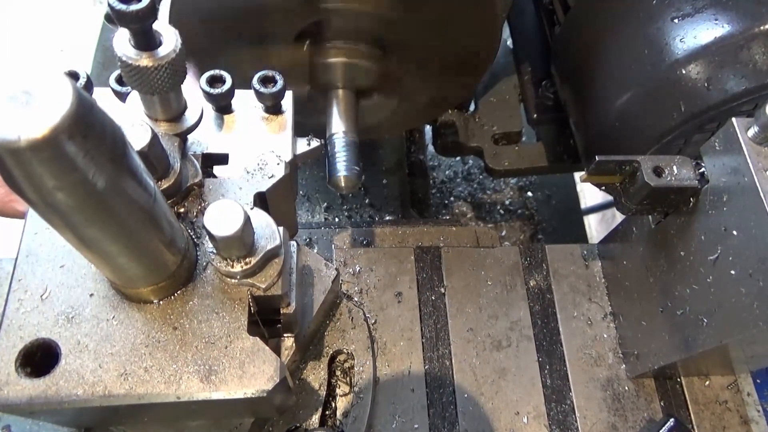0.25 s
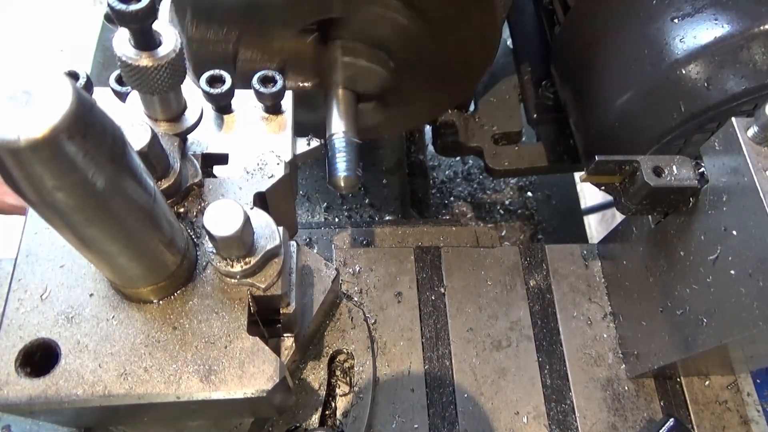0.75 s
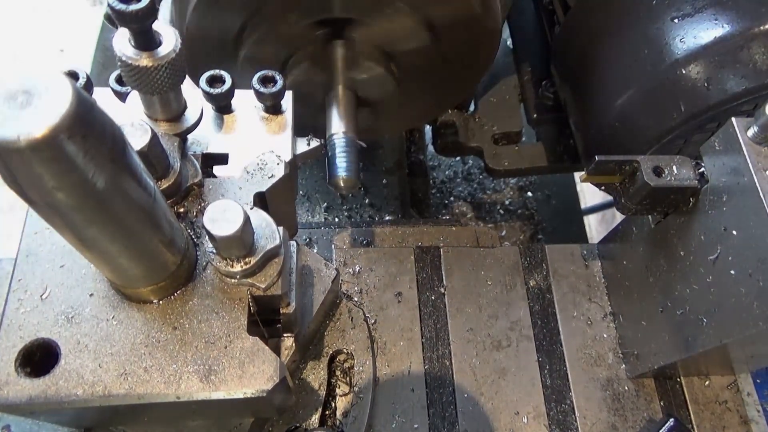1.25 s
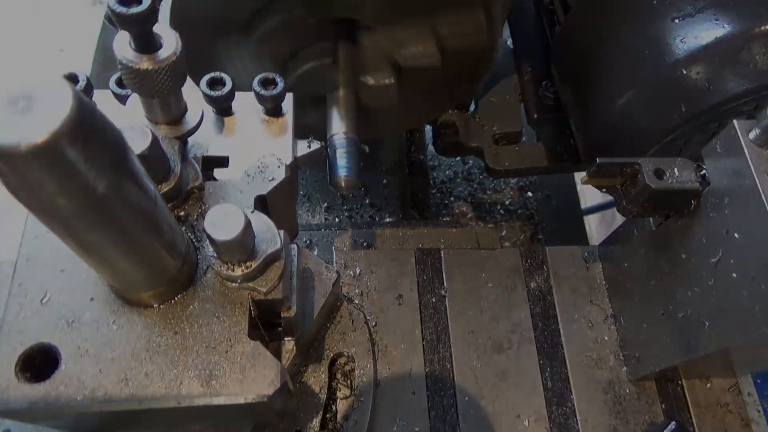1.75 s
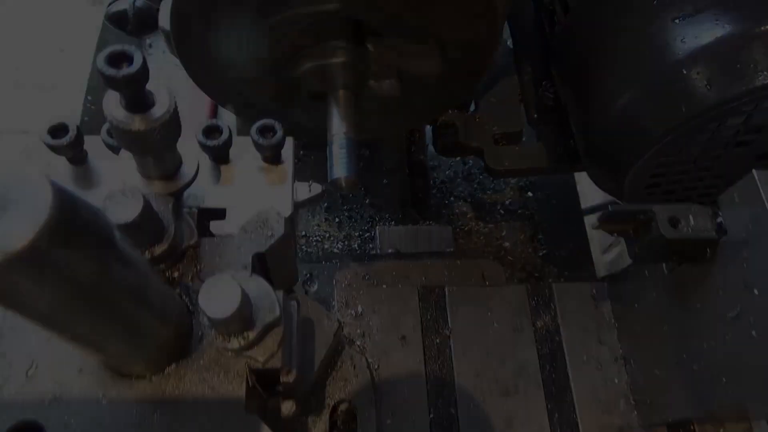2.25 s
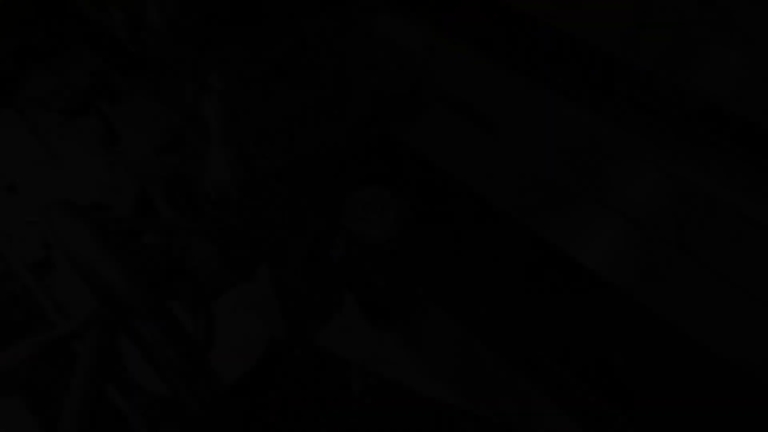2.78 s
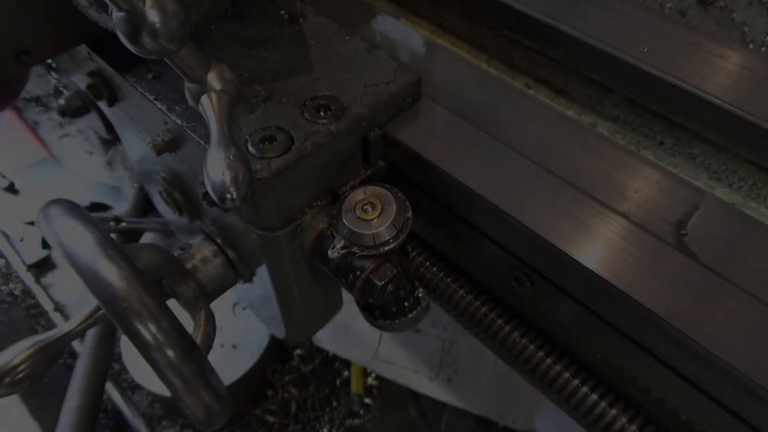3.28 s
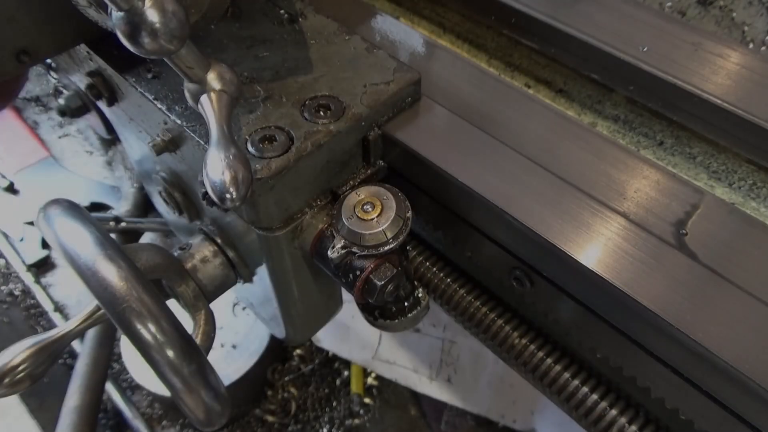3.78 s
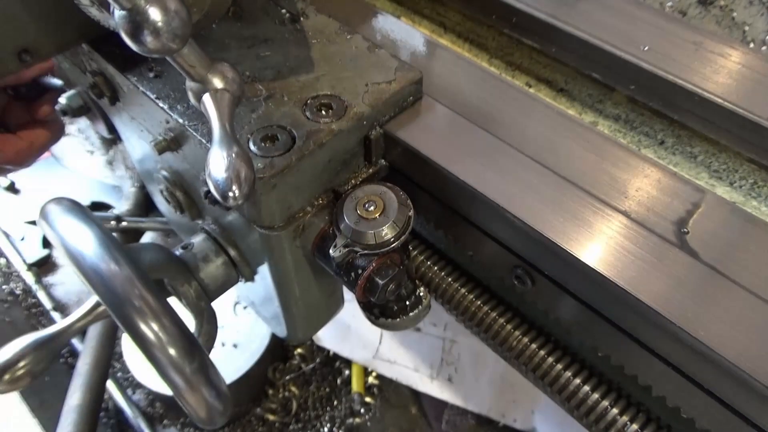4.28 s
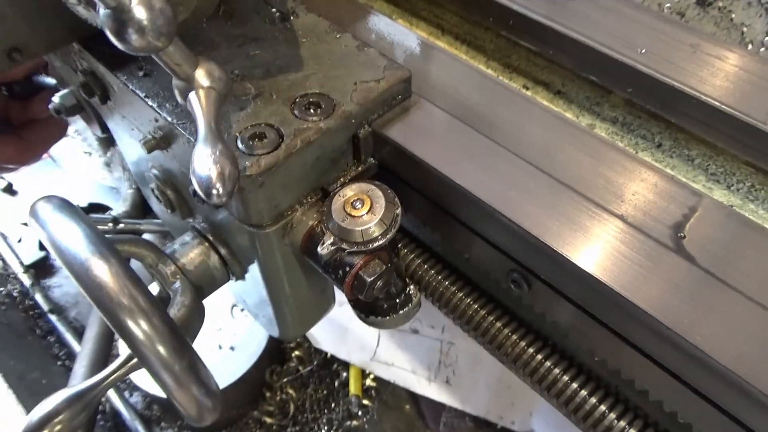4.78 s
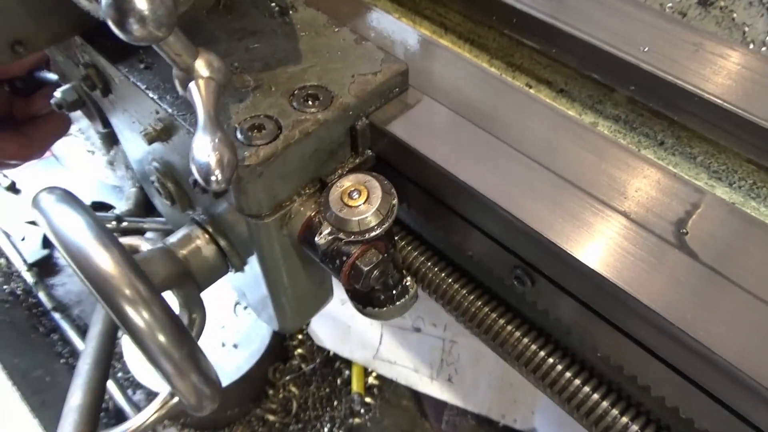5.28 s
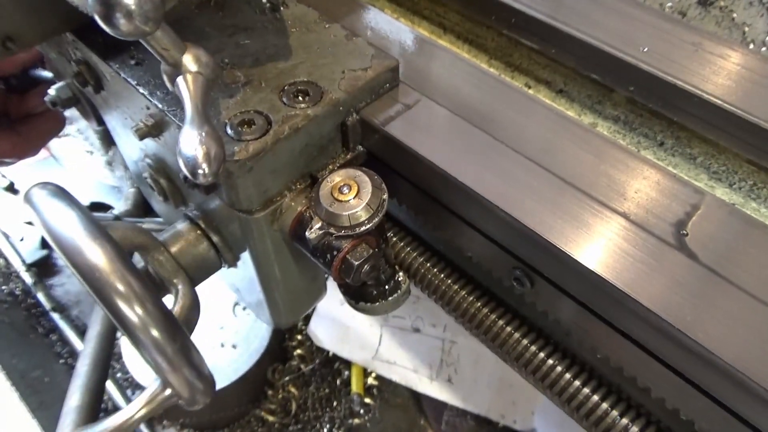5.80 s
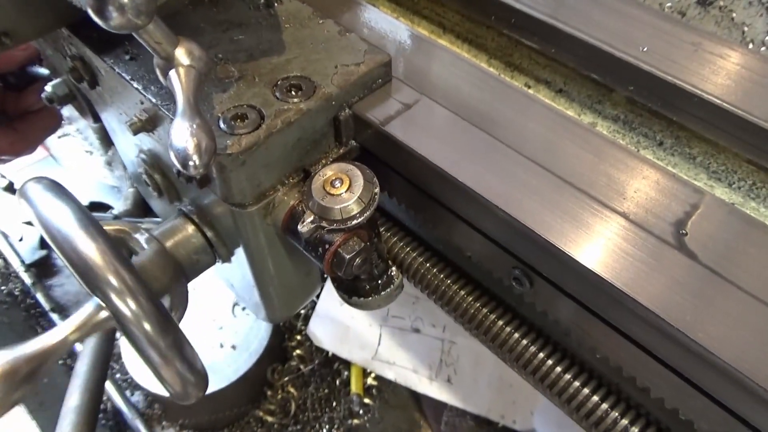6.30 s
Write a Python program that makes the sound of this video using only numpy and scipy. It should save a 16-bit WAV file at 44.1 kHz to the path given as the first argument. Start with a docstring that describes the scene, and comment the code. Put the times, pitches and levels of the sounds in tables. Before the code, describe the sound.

A piercing, steady high whistle rides over the rough churning and humming of a running metal lathe, with two hard lever clacks past the middle.

```python
"""Beside the chuck of a metal lathe, then at its carriage by the leadscrew, while it cuts a thread.
The inverter-fed motor whistles near 10 kHz as sidebands about a carrier, and hums on drive multiples.
Gears churn and rattle as noise filtered by the resonances of the iron castings.
A lever on the apron clacks twice, as bursts of noise in steel modes over decaying casting tones;
chips and teeth tick, rough swells come and go, and a limiter briefly lowers the level at peaks."""
import sys
import numpy as np
from scipy.fft import rfft, irfft, next_fast_len
from scipy.io import wavfile
from scipy.ndimage import uniform_filter1d, minimum_filter1d, map_coordinates

SR = 44100
rng = np.random.default_rng(int(sys.argv[2]) if len(sys.argv) > 2 else 0)


def dump_mix(stems):
    """Bounce the given channels to the path in sys.argv[1] as a 16-bit WAV at rate SR."""
    frames = np.atleast_2d(stems).T  # one column per channel
    limited = np.clip(frames, -1, 1)  # hard clip at full scale
    pcm = np.round(limited * 32767).astype(np.int16)
    wavfile.write(sys.argv[1], SR, pcm)


N = 288414

MOVE_S = 2.78  # the listening place changes from chuck to carriage
DRIVE_HZ, SLOT_HZ = 48.45, 721.4  # drive frequency, rate of passing rotor slots
CARRIER_HZ = (9894.5, 9899.7)  # switching carrier before and after the move
SPINDLE_TURN_S = 0.4925
THROW_S = 0.6  # time the drive takes to settle after the lever is thrown
TOP_HZ = 11150  # upper limit of the whole sound
LOAD_JITTER_DB, LOAD_JITTER_RATE = 0.78, 9  # each gear layer's own unsteadiness (dB, knots a second)
# gear layers: [level at chuck/dB, level at carriage/dB, rise per dB of load/dB]
RUMBLE_LEVEL = (-40.5, -37.5, 0.72)
CHURN_LEVEL = (-42.5, -36.5, 1.1)
RATTLE_LEVEL = (-35, -33.5, 0.49)

# inverter sidebands: [offset/drive cycles, relative level at chuck/dB, at carriage/dB]
CARRIER_SIDEBANDS = [(-15, -56, -51), (-14, -56, -49), (-12, -54, -52), (-11, -51, -47), (-9, -54, -43),
                     (-8, -49, -49), (-7, -50, -53), (-6, -45, -46), (-5, -45, -43), (-3, -30, -30),
                     (-2, -46, -38), (-1, -38, -43), (0, -33, -40), (1, -35, -41), (2, -44, -41),
                     (3, -24, -26), (4, -42, -37), (5, -28, -32), (6, -43, -36), (7, -32, -36),
                     (8, -51, -42), (9, -54, -43), (10, -54, -46), (11, -55, -50), (12, -52, -55),
                     (13, -54, -53)]
# spectrum of the switching jitter: [f/Hz, relative level/dB]
JITTER_SPECTRUM = [(8000, -29), (9000, -18.5), (9600, -13), (10000, 6.5), (10150, -7), (10400, -5.5),
                   (11000, -29.5), (11500, -64)]
# slow course of the whistle: [t/s, level/dB]
WHISTLE_LEVEL = [(0.0, -20.5), (1.56, -20.0), (1.68, -22.0), (2.28, -19.5), (2.34, -20.5), (2.7, -19.5),
                 (3.06, -22), (3.12, -23), (3.96, -22.0), (4.26, -23), (5.22, -20.5), (5.82, -23.5),
                 (5.94, -22.5), (6.52, -23)]
# lever contacts: [t/s, relative level/dB, upper edge set by hardness f/Hz]
LEVER_CONTACTS = [(4.0722, -2, 2750), (4.1552, -1.5, 9500), (4.165, -18, 6000), (4.177, -22, 6000),
                  (4.184, -22, 9000)]
# casting tones under the blows on the apron: [t/s, relative level/dB, f/Hz]
APRON_THUDS = [(4.076, -5, 488), (4.132, -14, 447), (4.163, -6, 170)]
# modes of the struck steel: [f/Hz, width/Hz, relative level/dB]
STEEL_MODES = [(1400, 300, -9.5), (2760, 370, 2), (3440, 920, -2), (4650, 850, -3), (5650, 620, 1),
               (6330, 330, -5), (7040, 430, 1.5), (8370, 540, 3), (9400, 590, -2)]
# ticks of chips and gear teeth: [t/s, relative level/dB]
TOOTH_TICKS = [(1.047, -22), (1.4182, -24), (1.962, -29), (2.7815, -28), (3.5848, -28), (3.79, -23.5),
               (4.244, -28), (5.8303, -29)]
# shudders and scrapes: [t/s, half length/s, level/dB, centre f/Hz]
ROUGH_SURGES = [(2.715, 0.034, -32, 910), (4.10, 0.026, -28.5, 520), (4.15, 0.017, -28, 380),
                (4.185, 0.04, -29.5, 232), (5.603, 0.046, -32.5, 426), (5.75, 0.027, -37.5, 2600),
                (6.017, 0.048, -29.5, 467), (6.285, .015, -40.5, 2600), (6.52, .035, -30.5, 430)]
# load on the gear train, followed by every gear layer and the hum: [t/s, level/dB]
GEAR_LOAD = [(0, -1), (1.4, 0.3), (1.9, -1.4), (2.7, 0), (2.94, 2.5), (3.2, -0.8), (4.0, 0.9), (5.4, -0.8),
             (5.6, 2), (6.54, 2.5)]
# broad spectrum of the churning: [f/Hz, relative level at chuck/dB, at carriage/dB]
CHURN_SPECTRUM = [(22, -29, -16), (44, -19, -20), (60.7, -25, -8), (78, -9.5, -5.5), (120, -3.5, 5.5),
                  (176, -8.5, -1), (250, -14.5, -10.5), (338, -15.5, -11), (600, -14.5, -15),
                  (1565, -12, -10), (2060, -19.5, -17), (3600, -24.5, -21.5), (6600, -27.5, -26.5),
                  (8500, -28, -24)]
# casting resonances: [f/Hz, width/Hz, lift at chuck/dB, lift at carriage/dB]
CASTING_MODES = [(463, 124, 5.5, 10), (907, 66, 7, 7), (1047, 22, 3, 6), (1170, 99, 3, 6),
                 (1658, 34, 7.5, 7), (1770, 123, 4.5, 6), (2150, 170, 5.5, 6.5), (2600, 300, 6, 0.5),
                 (2830, 100, 3.5, 3.5), (3365, 55, 2, 6.5), (4230, 210, 3, -0.5), (4630, 120, -4, 3),
                 (5070, 110, 2.5, 4)]
# low growl tones: [multiple of drive f, level over churn at chuck/dB, at carriage/dB]
GEAR_GROWL = [(8, -6.5, -5.5), (10, -19.5, -9.5)]
# magnetic hum: [multiple of drive f, relative level at chuck/dB, at carriage/dB,
# change once the lever is thrown/dB, rise per dB of load/dB, beat depth 0-1 at chuck, at carriage]
HUM_LINES = [(3, -36, -35, -0.5, 0.5, 0, 0.23), (6, -40.5, -41, 1.4, 1.13, 0.06, 0.27),
             (16, -39, -46, 7, 0.87, 0.43, 0.26)]
# beat of each hum line with a close neighbour, the upper two once per spindle turn:
# [period/s, first crest t/s]
LINE_BEATS = [(0.73, 0.485), (SPINDLE_TURN_S, 0.137), (SPINDLE_TURN_S, 0.268)]
# momentary fades of a hum line: [multiple of drive f, t/s, half length/s, change/dB]
LINE_FADES = [(3, 2.25, 0.42, -3), (3, 6.35, 0.2, -2.5), (6, 5.36, 0.094, -12), (16, 2.6, 0.27, -3)]
# rough motor drone: [multiple of drive f, level at chuck/dB, at carriage/dB]
MOTOR_DRONE = [(14, -49, -61), (18, -46, -45), (22, -45.5, -48), (24, -51, -39), (36, -56, -58)]
# rotor slot tones: [multiple of slot rate, drive cycles added before rounding,
# level at chuck/dB, at carriage/dB]
SLOT_TONES = [(1, -3, -51.5, -61.5), (1, -1.5, -55, -63), (1, 0, -39, -46.5), (1, 8.5, -47, -47),
              (2, 1.5, -49.5, -53.5), (3, 0, -55, -52.5), (3, 2.5, -55.5, -73)]
# thin motor tones: [f/Hz, level/dB]
THIN_TONES = [(2537, -58.5), (2596, -55.5), (8056, -55.5), (8347, -74), (8638, -56), (8742, -68),
              (9032, -49)]
# rough whirr after the throw of the lever: [multiple of drive f, relative level/dB]
FEED_WHIRR = [(10, -40.5), (36, -48), (38, -50), (45, -49)]
# stereo coherence: [f/Hz, left-right likeness 0-1]
EAR_LIKENESS = [(40, 1), (150, 0.84), (300, 0.54), (1000, 0.87), (4000, 0.72), (9000, 0.97)]


def inverter(jitter_db=-10.0):
    """Pulse-width switching: a carrier and its sidebands sing in the motor shell, with a hiss of jitter."""
    t = clock()
    carrier = np.cumsum(CARRIER_HZ[0] + moved() * (CARRIER_HZ[1] - CARRIER_HZ[0])) / SR
    lines = np.zeros((2, N))
    for k, chuck_db, carriage_db in CARRIER_SIDEBANDS:
        cycles = carrier + k * DRIVE_HZ * t
        lines += tone(cycles, between(chuck_db, carriage_db), waver=0.16, rate=7.1, width=0.16, scatter=0.77)
    noise = spread(rng.standard_normal((2, N)))
    jitter = unit(filtered(noise, lambda hz: amp(along(JITTER_SPECTRUM, hz))))
    # the whistle swells twice within each drive cycle
    bursts = (even(lines) + amp(jitter_db) * jitter) * buzz(depth=.36)
    return amp(curves(WHISTLE_LEVEL)[0]) * even(bursts)


def lever():
    """Impact of unequal bodies: light steel clicks and rings briefly while the heavy apron thuds."""
    out = np.zeros((2, N))
    for s, db, edge_hz in LEVER_CONTACTS:
        out += amp(db) * knock(s, edge_hz, t60=0.013, ring_db=-21, ring_t60=0.14)
    t = np.arange(SR // 3) / SR
    for s, db, hz in APRON_THUDS:
        # two close modes of the heavy casting swell and die together
        lower_mode = 0.53 * np.sin(2 * np.pi * (0.784 * hz * t + rng.random()))
        pair = np.sin(2 * np.pi * hz * t) + lower_mode
        envelope = (1 - np.exp(-t / 0.0064)) * amp(-60 * t / 0.07)
        out += placed(s, amp([[db], [db]]) * pair * envelope)
    return out


def ticks(tick_db=-10):
    """Small impacts: chips and loose teeth tick against the steel."""
    out = np.zeros((2, N))
    for s, db in TOOTH_TICKS:
        out += amp(db + tick_db) * knock(s, edge_hz=4500, t60=0.045, ring_db=-7, ring_t60=0.15)
    return out


def knock(s, edge_hz, t60, ring_db, ring_t60):
    """Impact excites modes: a short crack and a weaker ring; a softer contact loses the highs above edge_hz."""
    t = np.arange(SR // 3) / SR

    def response(hz):
        modes = sum(amp(db) / (1 + (2 * (hz - f) / width) ** 2) for f, width, db in STEEL_MODES)
        return modes / (1 + (hz / edge_hz) ** 4)

    steel = unit(filtered(spread(rng.standard_normal((2, len(t)))), response))
    rise = 1 - np.exp(-t / .001)
    crack = amp(-60 * t / t60)
    ring = amp(ring_db - 60 * t / ring_t60)
    return placed(s, steel * rise * (crack + ring))


def gears(spiky=0.31):
    """Random excitation of a resonant body: countless tooth and bearing contacts shake the castings."""
    contacts = rng.standard_normal((2, N)) * np.exp(spiky * np.tanh(wobble(700)))
    shake, place = spread(contacts), moved()
    at_chuck = unit(castings(shake, axis=1)) * np.sqrt(1 - place)
    at_carriage = unit(castings(shake, axis=2)) * np.sqrt(place)
    body = at_chuck + at_carriage

    def below(hz, edge_hz):
        return 1 / (1 + (hz / edge_hz) ** 8)

    # the rumble leans to the left
    rumble = filtered(body, lambda hz: below(hz, edge_hz=300)) * amp([[1.1], [-1.1]])
    churn = filtered(body, lambda hz: below(hz, edge_hz=856) - below(hz, edge_hz=234))
    rattle = filtered(body, lambda hz: 1 - below(hz, edge_hz=580)) * buzz(depth=0.079)
    growl = drive_lines(GEAR_GROWL, waver=0.36, rate=16, width=0.3)
    out = loaded(*RUMBLE_LEVEL) * even(rumble)
    out += loaded(*CHURN_LEVEL) * (even(churn) + growl)
    out += loaded(*RATTLE_LEVEL) * even(rattle)
    return out


def castings(x, axis, ripple_db=3.0):
    """Modal filtering: a broad slope, main resonances and a ripple of many small ones colour one place."""
    spots = np.geomspace(1200, 9000, 130)
    ripple = ripple_db * np.pad(rng.standard_normal(len(spots) - 2), 1)

    def response(hz):
        lift = sum(row[axis + 1] / (1 + (2 * (hz - row[0]) / row[1]) ** 4) for row in CASTING_MODES)
        return amp(along(CHURN_SPECTRUM, hz, axis=axis) + lift + np.interp(hz, spots, ripple))

    return filtered(x, response)


def loaded(chuck_db, carriage_db, per_load):
    """Force sets level: a gear layer follows the listening place and the load, a little unsteadily."""
    load_db, = curves(GEAR_LOAD)
    jitter_db = LOAD_JITTER_DB * wobble(LOAD_JITTER_RATE)
    return between(chuck_db, carriage_db) * amp(per_load * load_db + jitter_db)


def hum():
    """Magnetic attraction: lines on drive multiples grow with load, beat, and shift after the lever."""
    load_db, = curves(GEAR_LOAD)
    out = np.zeros((2, N))
    for line, (period_s, crest_s) in zip(HUM_LINES, LINE_BEATS):
        k, chuck_db, carriage_db, lever_db, per_load, chuck_depth, carriage_depth = line
        fade_db = sum(db * swell(s, length) for m, s, length, db in LINE_FADES if round(m) == round(k))
        level = between(chuck_db, carriage_db) * amp(per_load * load_db + lever_db * thrown() + fade_db)
        depth = chuck_depth + moved() * (carriage_depth - chuck_depth)
        level = level * beat(period_s, crest_s, depth)
        out += tone(round(k) * DRIVE_HZ * clock(), level, waver=0.1, rate=12, width=0.047)
    return out * amp(0) * np.array([[1], [-1]]) * amp([[.8], [-.8]]) * np.array([[1], [-1]])


def beat(period_s, crest_s, depth):
    """Interference: the gain of a line that swells and fades against a close neighbour."""
    turn = np.exp(2j * np.pi * (clock() - crest_s) / period_s)
    return np.abs(1 + depth * turn) / np.sqrt(1 + depth ** 2)


def buzz(depth):
    """Force goes as the square of the field: the motor's pull peaks twice in each drive cycle."""
    return unit(1 + depth * np.cos(4 * np.pi * DRIVE_HZ * clock()))


def motor():
    """Periodic magnetic force: a rough drone, the whine of passing rotor slots and a few thin tones."""
    t = clock()
    out = drive_lines(MOTOR_DRONE, waver=0.56, rate=24, width=0.46)
    for m, k, chuck_db, carriage_db in SLOT_TONES:
        cycles = (round(m) * SLOT_HZ + round(k) * DRIVE_HZ) * t
        out += tone(cycles, between(chuck_db, carriage_db), waver=0.14, rate=7, width=0.39)
    for hz, db in THIN_TONES:
        out += tone(hz * t, amp(db), waver=0.38, rate=6.4, width=0.48)
    return out


def feed():
    """Randomly modulated harmonics: after the lever is thrown the gearing adds a rough whirr."""
    whirr = np.zeros((2, N))
    for k, db in FEED_WHIRR:
        whirr += tone(round(k) * DRIVE_HZ * clock(), amp(db), waver=1.2, rate=45, width=0.41)
    return thrown() * whirr


def surges(octaves=0.45):
    """Band-limited friction noise: the machine shudders or scrapes in short rough swells."""
    out = np.zeros((2, N))
    for s, length, db, centre_hz in ROUGH_SURGES:
        band = lambda hz: 1 / (1 + (np.log2((hz + 1) / centre_hz) / octaves) ** 4)
        rub = unit(filtered(spread(rng.standard_normal((2, N))), band))
        out += amp(db) * rub * swell(s, length)
    return out


def drive_lines(rows, **roughness):
    """Harmonic series: wavering tones on multiples of the drive frequency."""
    return sum(tone(round(k) * DRIVE_HZ * clock(), between(a, b), **roughness) for k, a, b in rows)


def tone(cycles, level, waver, rate, width, scatter=1):
    """Narrow-band line: random quadrature modulation; phase starts within scatter cycles, ears differ."""
    swing = level * np.sqrt(2 / (1 + 2 * waver ** 2))
    angle = (2 * np.pi * ((cycles + scatter * rng.random()) % 1)).astype(np.float32)
    mid = (1 + waver * wobble(rate)) * np.sin(angle) + waver * wobble(rate) * np.cos(angle)
    side = width * rng.choice([-1, 1]) * np.cos(angle)
    return swing * np.array([mid + side, mid - side])


def spread(pair):
    """Partial coherence: two unrelated signals become a mostly alike left and right."""
    def response(hz):
        turn = np.arccos(np.clip(along(EAR_LIKENESS, hz), -1, 1)) / 2
        return np.array([np.cos(turn), np.sin(turn)])

    mid, side = filtered(pair, response)
    return np.array([mid + side, mid - side])


def moved():
    """Listening position: 0 beside the chuck, 1 at the carriage."""
    return np.clip((clock() - MOVE_S) / 0.021 + .5, 0, 1)


def between(chuck_db, carriage_db):
    """Position-dependent gain: it follows the change of listening place."""
    return amp(chuck_db) + moved() * (amp(carriage_db) - amp(chuck_db))


def thrown():
    """Drive transition: 0 before the lever is thrown, 1 once the drive has settled."""
    return np.clip((clock() - LEVER_CONTACTS[0][0]) / THROW_S, 0, 1)


def swell(s, half_length_s):
    """Gaussian envelope: a smooth bump of height 1 around s."""
    return np.exp(-.5 * ((clock() - s) / half_length_s) ** 2)


def wobble(rate):
    """Slow random modulation: a smooth curve, rate knots a second."""
    coarse = clock()[::32]
    knots = rng.standard_normal(int(N * rate / SR) + 4)
    return np.interp(clock(), coarse, map_coordinates(knots, [coarse * rate]))


def filtered(x, response):
    """Linear filtering: the spectrum of x times a response of frequency."""
    m = next_fast_len(x.shape[-1] + 8192)
    return irfft(rfft(x, m) * response(np.fft.rfftfreq(m, 1 / SR)), m)[..., :x.shape[-1]]


def even(x):
    """Level normalization: x with its slow rms level held at 1."""
    return x / np.sqrt(np.abs(uniform_filter1d(np.mean(x ** 2, axis=0), size=SR // 4)))


def placed(s, sound):
    """Superposition in time: a short stereo sound laid into the scene at s."""
    return np.pad(sound, ((0, 0), (round(s * SR), N)))[:, :N]


def along(points, hz, axis=1):
    """Logarithmic pitch scale: one column of a table interpolated over log frequency."""
    table = np.transpose(points)
    return np.interp(np.log(hz + 1), np.log(table[0]), table[axis])


def curves(rows):
    """Time interpolation: one value per sample for each column after the time."""
    s, *cols = np.transpose(rows)
    return [np.interp(clock(), s, c) for c in cols]


def amp(db):
    """Decibel law: amplitude ratio of a level."""
    return 10 ** (np.asarray(db) / 20)


def unit(x):
    """Root mean square: x scaled to an rms of 1."""
    return x / np.sqrt(np.mean(x ** 2) + 1e-20)


def clock():
    """Uniform sampling: the time of each sample in seconds."""
    return np.arange(N) / SR


def scene():
    """Superposition: the running lathe with its small events."""
    return inverter() + lever() + ticks() + gears() + hum() + motor() + feed() + surges()


def limiter(x, ceiling_db, release):
    """Peak limiting: gain falls just ahead of a peak and then recovers; the detector is dull to high treble."""
    sensed = filtered(x, lambda hz: 1 / (1 + (hz / 8500) ** 8))
    excess = np.maximum(np.abs(sensed).max(axis=0) / amp(ceiling_db), 1)
    ahead = -minimum_filter1d(-np.log(excess), size=45)
    fade = clock() / release
    held = np.exp(np.maximum.accumulate(np.log(ahead + 1e-9) + fade) - fade)
    return x * np.exp(-uniform_filter1d(held, size=23))


def record(dry):
    """Limiting and band limiting: peaks are held down and nothing above TOP_HZ is kept."""
    return filtered(limiter(dry, ceiling_db=-10.8, release=0.028), lambda hz: hz < TOP_HZ)


dry = scene()
out = record(dry)
dump_mix(out)
```